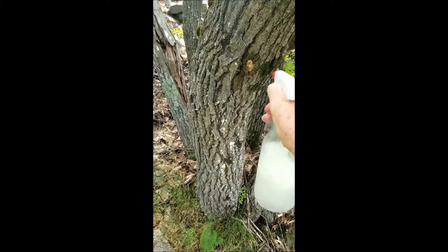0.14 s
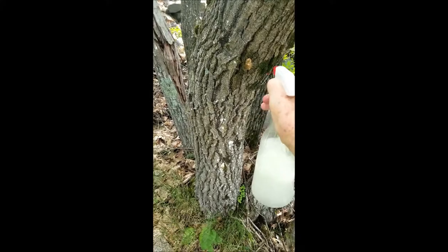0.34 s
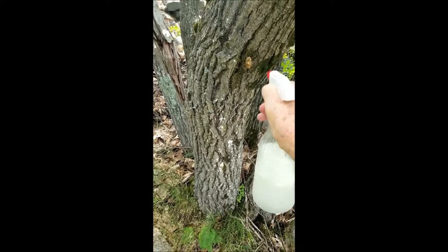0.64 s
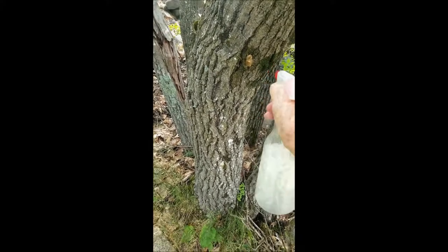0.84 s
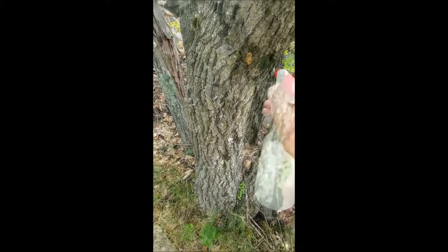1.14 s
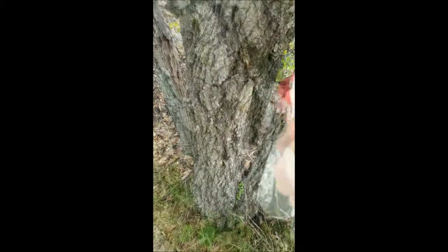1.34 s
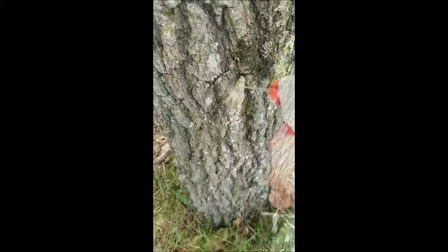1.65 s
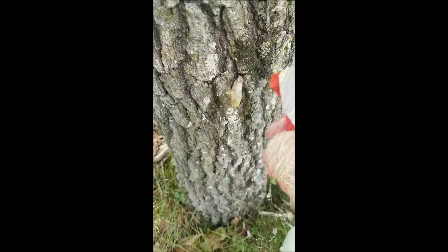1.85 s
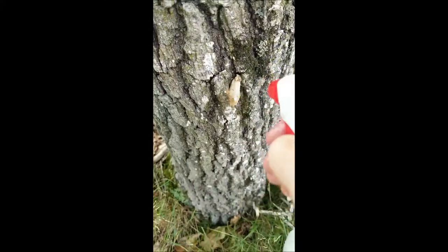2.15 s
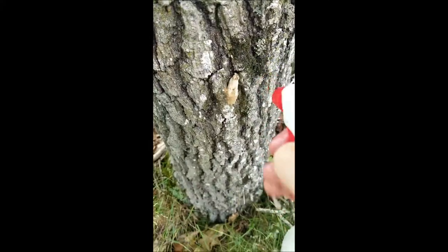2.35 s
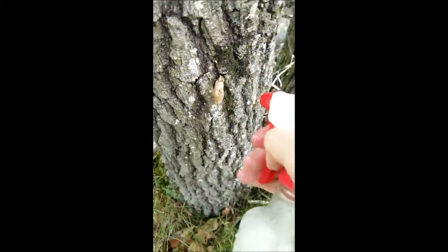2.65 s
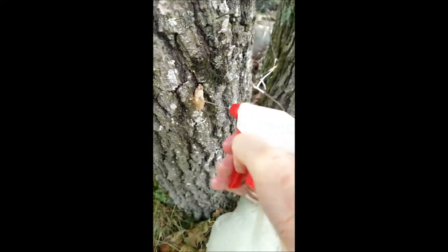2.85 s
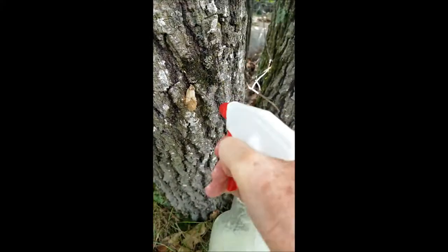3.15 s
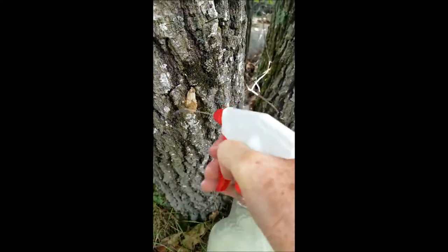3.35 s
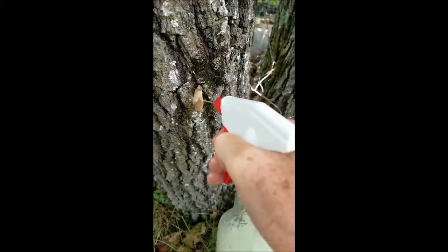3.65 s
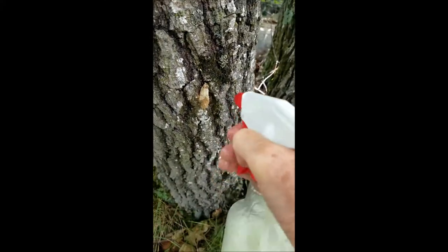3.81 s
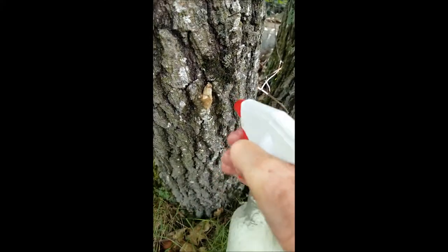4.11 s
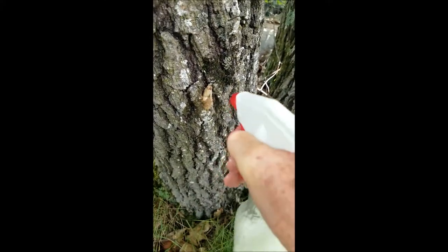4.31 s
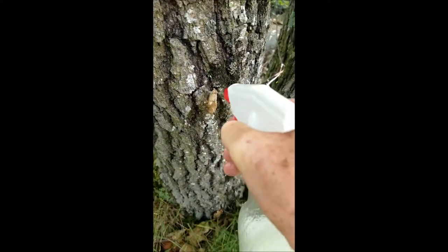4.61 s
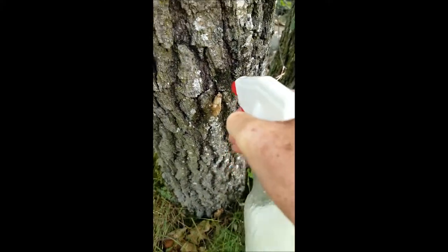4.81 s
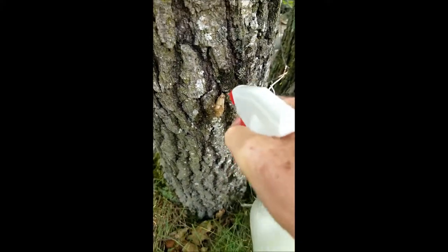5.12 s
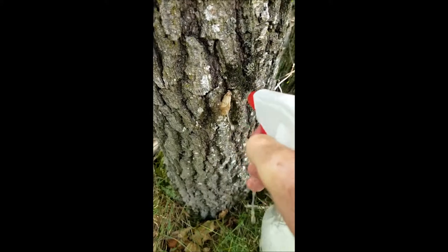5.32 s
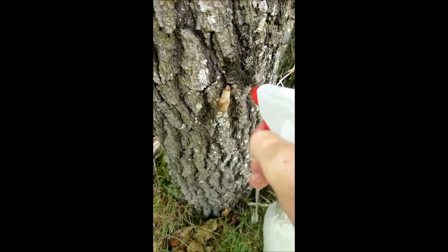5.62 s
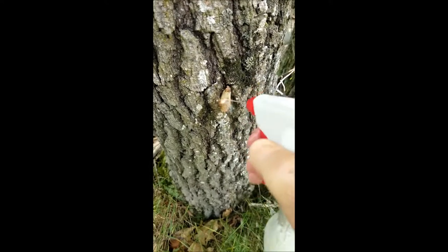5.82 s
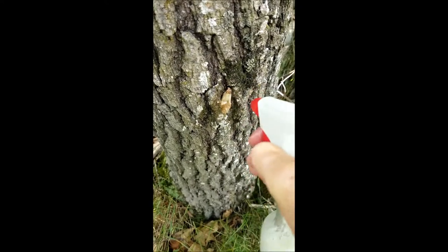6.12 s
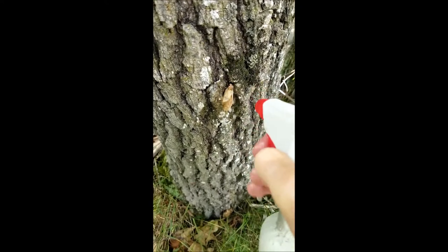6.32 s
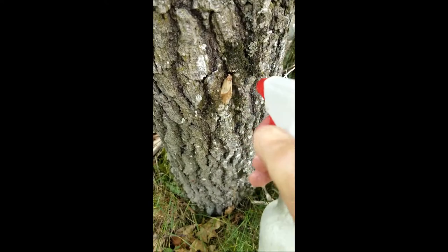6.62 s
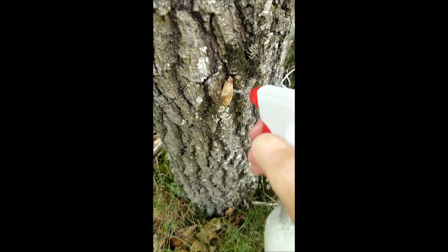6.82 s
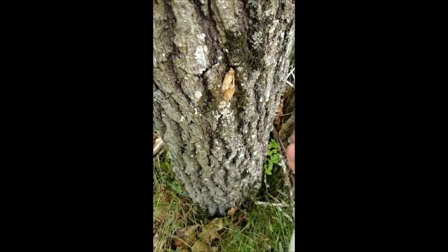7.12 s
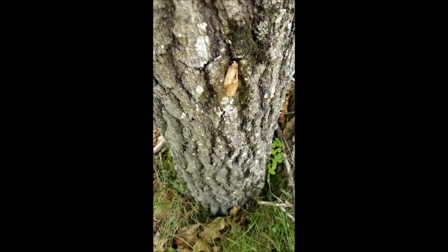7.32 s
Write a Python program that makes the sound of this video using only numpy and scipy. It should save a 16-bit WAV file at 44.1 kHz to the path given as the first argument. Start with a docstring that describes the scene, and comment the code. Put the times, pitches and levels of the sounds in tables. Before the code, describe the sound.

A plastic trigger spray bottle squirts at a tree trunk in a garden, close to the microphone and to the left. Two faint squirts come in the first half second. From about 0.8 seconds they are louder and repeat roughly three times a second, each a brief, bright hiss with drops spattering on bark. Wind and handling thump and rumble on the microphone until about 1.5 seconds, strongest around 1 second. The spraying is fullest from 1.3 to 2.3 seconds, softer near 3.4 and 4.6, and strong again from 5.5 until the last squirt near 6.9. Faint trigger ticks, dull hollow knocks and a few tiny air bubbles fall among the squirts, with a few last clicks after 7 seconds. Leaves hiss softly throughout. A distant engine's low hum comes in around 1.5 seconds, swelling and fading, loudest just after 6 seconds.

```python
"""In a garden, a plastic spray bottle is pumped at a tree trunk about three times a second.
Each squeeze, close to the left microphone, is a nozzle hiss plus drops spattering in the bark's grooves.
The trigger ticks and knocks against its stop, and now and then air bubbles back into the bottle.
Wind and handling bump the microphone at first, and a far engine hums behind the soft hiss of leaves."""
import sys
import numpy as np
from scipy import signal
from scipy.fft import rfft, irfft
from scipy.io import wavfile

SR = 44100
rng = np.random.default_rng(int(sys.argv[2]) if len(sys.argv) > 2 else 0)


def store_pcm(level_fs):
    """Save levels as 16-bit WAV."""
    pcm = np.round(np.clip(level_fs, -1, 1) * 32767).astype(np.int16)
    wavfile.write(sys.argv[1], SR, np.atleast_2d(pcm).T)


N = 328986
TIME = np.arange(N) / SR

# Levels in the tables are relative: the functions turn each layer up or down as a whole.
# Squeezes of the trigger; the jet's times count from the start of each squeeze:
# (start [s], length [s], hiss [dB], spatter [dB], splash [dB], pitch of the bark groove [Hz],
# jet crosses the groove [s], lingers there [s], jet meets wet bark [s], right side against left [dB])
SQUEEZES = [(0.018, 0.064, -51.5, -50, -48.5, 4460, .047, .06, 0.056, 0.5),
            (0.471, 0.059, -49, -49.5, -62, 5540, .004, .06, .05, -0.5),
            (0.759, 0.11, -34.5, -41.5, -49, 6500, 0.039, .052, 0.05, -9.5),
            (0.902, 0.046, -47, -44, -44, 4220, .002, 0.013, 0.033, -1),
            (1.057, 0.1, -35, -43.5, -49.5, 5850, .012, 0.058, .044, -8.5),
            (1.345, 0.11, -31, -28.5, -42.5, 6300, 0.055, 0.041, 0.031, -7.5),
            (1.626, 0.11, -30, -26.5, -36, 5500, 0.048, 0.04, 0.015, -9.5),
            (1.922, .112, -39, -43, -48, 6400, 0.038, 0.062, .051, -9),
            (2.2, 0.11, -29.5, -24.5, -32, 3900, 0.037, 0.054, 0.004, -8.5),
            (2.521, 0.11, -36, -30.5, -35.5, 3920, 0.062, 0.027, 0.07, -7.5),
            (2.822, 0.089, -39, -36.5, -46.5, 3540, 0.041, 0.024, 0.036, -9.5),
            (3.079, 0.081, -40, -34.5, -40.5, 4180, 0.055, .018, 0.061, -7),
            (3.36, 0.11, -47, -48, -42.5, 4100, 0.077, 0.013, 0.097, -6),
            (3.63, 0.12, -33.5, -28, -42.5, 6340, 0.078, 0.016, 0.084, -8),
            (3.956, 0.1, -35, -39.5, -33.5, 5300, .053, 0.048, .076, -7.5),
            (4.251, .1, -31, -30.5, -33.5, 4400, .042, 0.046, .006, -6.5),
            (4.582, .118, -40, -50.5, -55, 6500, .03, 0.074, .041, -8),
            (4.887, .104, -36, -46.5, -51, 6240, 0.075, 0.07, 0.099, -9.5),
            (5.204, .11, -31.5, -35, -49, 5900, 0.09, 0.071, 0.044, -8),
            (5.514, 0.11, -32, -23.5, -36, 5900, 0.023, 0.059, 0.017, -8),
            (5.833, 0.1, -31.5, -24, -33, 5600, .047, 0.024, 0.024, -7),
            (6.176, 0.11, -33, -30, -31.5, 5040, 0.026, 0.091, 0.015, -8),
            (6.505, .096, -28.5, -27.5, -41, 6200, 0.045, 0.027, 0.049, -7),
            (6.839, 0.094, -30.5, -29.5, -38.5, 6200, 0.063, 0.05, 0.036, -7)]
# The jet spits or hits a hollow in the bark: (time [s], level [dB], pitch [Hz], length [s])
SPITS = [(.476, -42, 14000, .007), (1.054, -25, 14500, 0.0057), (1.066, -25, 13600, 0.0087),
         (1.348, -36, 14500, .006), (1.625, -28, 3000, 0.016), (1.675, -16.5, 5800, .012),
         (1.702, -14, 6500, .01), (1.92, -30.5, 14000, 0.0074), (2.518, -36, 15000, .008),
         (3.066, -22.5, 4140, 0.015), (3.067, -31, 13500, .012), (3.359, -31, 15000, 0.01),
         (3.36, -33, 3340, .009), (2.203, -25, 3220, 0.019), (3.695, -22, 5550, 0.022),
         (4.285, -20.5, 4000, 0.016), (5.216, -29, 13500, .01), (5.285, -23.5, 4630, 0.011),
         (5.567, -16.5, 5550, 0.014), (5.867, -24, 5800, .012), (5.908, -32, 6290, .01),
         (6.54, -21, 6190, 0.013)]
# Trigger, spring and fingers click on the plastic: (time [s], level [dB], pitch [Hz])
TICKS = [(.886, -45, 2240), (1.186, -44, 2100), (1.476, -45, 1200), (1.554, -42, 3830), (1.77, -43, 2220),
         (2.056, -44, 5970), (2.1435, -40, 1540), (2.334, -42, 2400), (2.464, -42.5, 1780),
         (2.6345, -40, 2080), (2.658, -39, 2320), (2.742, -44, 6100), (2.9463, -43.5, 4240),
         (3.249, -33, 1840), (3.32, -43.5, 6400), (3.598, -43.5, 3590), (3.803, -44.5, 3600),
         (4.095, -43.5, 3800), (5.0495, -43, 2130), (5.13, -45, 1100), (5.743, -40, 1300),
         (6.054, -39.5, 2130), (6.935, -37.5, 3010), (7.157, -35.5, 1200), (7.162, -37.5, 3400),
         (7.2798, -38, 3250)]
# The trigger hits its stop and the bottle sounds hollow: (time [s], level [dB], pitch [Hz])
KNOCKS = [(.761, -37.5, 298), (1.552, -42.5, 249), (1.706, -44.5, 304), (2.002, -49.5, 300),
          (2.729, -46.5, 265), (3.131, -41.5, 287), (3.251, -43.5, 229), (3.712, -44.5, 287),
          (4.321, -42, 236), (4.838, -49, 263), (4.969, -41, 270), (5.292, -45.5, 280), (6.907, -40.5, 306)]
# Air bubbles back into the bottle: (time [s], level [dB], pitch [Hz])
BUBBLES = [(2.147, -53, 1600), (2.476, -39, 1770), (2.72, -44, 2200), (3.511, -47.5, 2300),
           (4.838, -48, 1670), (5.983, -40.5, 2294)]
# One gust on the microphone that dies away: (time [s], level [dB])
GUST_LEVELS = [(0, -47), (.33, -53), (.72, -49.5), (.83, -32), (.94, -40.5), (1.12, -35.5), (1.19, -44.5),
               (1.46, -46), (1.56, -72)]
# Thumps and scuffs on the microphone, from wind and handling:
# (time [s], level [dB], pitch [Hz], length [cycles])
MIC_BUMPS = [(0.2, -29, 72, 0.94), (0.667, -32.5, 56, 2.2), (0.816, -35.5, 306, 2.6),
             (.818, -21.5, 58.5, 1.2), (.877, -25, 80, 1.35), (0.982, -27, 59.6, 1),
             (1.062, -25.5, 199, 4.2), (1.071, -32.5, 386, 3), (1.105, -24, 86.6, 1.85),
             (1.138, -27, 59.6, 1.2), (1.236, -21, 76.4, 1.75), (1.26, -35, 263, 3.6),
             (1.455, -33, 65, 1.6), (2.125, -42, 60, 1.7)]
# The far engine swells and fades: (time [s], level [dB])
ENGINE_LEVELS = [(.7, -65), (1.45, -49), (2.05, -48.5), (2.34, -43), (3.3, -45.5), (4.25, -52), (4.68, -45),
                 (5.1, -43), (5.35, -46.5), (6.07, -37.5), (6.32, -37), (6.72, -45.5), (7.06, -39),
                 (7.46, -42.5)]
# The tones in the engine's hum: (pitch [multiples of the firing rate], level [dB])
ENGINE_TONES = [(.5, -27), (1, 3.5), (1.5, -20.5), (2, -25), (2.5, -24), (3, -43), (3.5, -29.5)]
# The garden's background: (time [s], leaf hiss [dB], far rumble [dB])
GARDEN_LEVELS = [(0, -60, -58), (.48, -62.5, -69), (.95, -60, -55.5), (1.7, -61, -60), (2.9, -64, -66.5),
                 (3.9, -64, -63.5), (6.2, -57.5, -56), (6.7, -60, -57.5), (7.46, -59.5, -61)]
# The highest part of the leaf hiss: (time [s], level [dB])
FINE_HISS_LEVELS = [(0, -63), (1.7, -64), (2.8, -70.5), (4.7, -64), (6.0, -61.5), (7.46, -63.5)]

# A spectrum says how strong a noise is from low to high.
# Mist leaving the nozzle: (frequency [Hz], level [dB])
NOZZLE_SPECTRUM = [(1500, -10), (3000, -22), (4000, -11), (6200, -1), (7400, -2.5), (8600, -8),
                   (10000, -5.5), (12000, 1), (13700, 4), (15600, 2), (17000, -4.5)]
# Drops hitting bark: (frequency [Hz], level [dB])
SPATTER_SPECTRUM = [(1500, -43), (2400, -2.5), (3100, -0.5), (4000, 0), (6800, 1), (8400, -9),
                    (11000, -3.5), (16000, -15)]
# Drops landing where the bark is already wet: (frequency [Hz], level [dB])
SPLASH_SPECTRUM = [(600, -12.5), (950, -17.5), (1400, -5.5), (2200, -0.5), (2900, 1), (4000, 4),
                   (6000, -35)]
# Wind on the microphone: (frequency [Hz], level [dB])
WIND_SPECTRUM = [(22, -6), (50, 0), (75, 3.5), (110, 0), (150, -6), (200, -11), (280, -19), (700, -34)]
# Hissing leaves: (frequency [Hz], level [dB])
LEAF_SPECTRUM = [(410, -2.5), (700, -2.5), (934, -5), (1080, -2.5), (1380, -3.5), (2160, -3), (2560, -4.5),
                 (3280, -3), (4430, -4), (5610, -4), (8650, -13.5), (12800, -5.5), (16000, -8.5)]
# Far rumble: (frequency [Hz], level [dB])
RUMBLE_SPECTRUM = [(30, -16), (60, -1), (150, -0.5), (200, -5), (300, -7), (440, -8.5), (700, -18.5),
                   (1200, -38.5)]


def squirts(open_s, close_s, sag_db, flutter_db):
    """The nozzle turns liquid into mist; drops make a groove in the bark ring and splash on wet spots."""
    mist = shape_noise(droplets(per_s=17000, spread_db=3.5), NOZZLE_SPECTRUM)
    impacts = shape_noise(droplets(per_s=26000, spread_db=1), SPATTER_SPECTRUM)
    splashes = shape_noise(droplets(per_s=4000, spread_db=0), SPLASH_SPECTRUM)
    hiss, bark = np.zeros((2, 2, N))
    sides_db = np.zeros((2, N))
    for start, length, hiss_db, spatter_db, splash_db, hz, groove_s, linger_s, wet_s, right_db in SQUEEZES:
        span = slice(int(start * SR), int((start + length) * SR))
        t = TIME[span] - start
        # The valve snaps open, then closes as the pressure runs out.
        valve = np.clip(np.minimum(t / open_s, (length - t) / close_s), 0, 1)
        flow = valve * from_db(-sag_db * (2 * t / length - 1) ** 2)  # strongest in the middle
        off_groove = off_target(t, groove_s, linger_s)
        off_wet = off_target(t, wet_s, linger_s=0.033)
        ringing = rms_one(resonate(impacts[:, span], hz, q=1.38))
        # Each part is quieter while the jet is beside its spot.
        hiss[:, span] += flow * from_db(hiss_db - 0.5 - 9 * off_groove) * mist[:, span]
        bark[:, span] += flow * from_db(spatter_db - 18.5 * off_groove) * ringing
        bark[:, span] += flow * from_db(splash_db - 14.5 * off_wet) * splashes[:, span]
        sides_db[1, span.start:] = right_db
    spray = from_the_left(hiss, right_db=-0.5, direct=0.13) + from_the_left(bark, right_db=-3, direct=0.13)
    flutter = flutter_db * drift(per_s=220)  # the jet breaks up unevenly
    return from_db(sides_db + flutter) * trunk_echo(spray, delay_s=0.000895, strength=0.43)


def off_target(t, crossing_s, linger_s):
    """How far the sweeping jet is from a spot: 0 right on it, 1 well beside it."""
    return 1 - np.exp(-((t - crossing_s) / linger_s) ** 2)


def trunk_echo(spray, delay_s, strength):
    """Sound bounces off the trunk; the path changes as the hand moves, so each squirt has its own tone."""
    moving_delay = delay_s * from_db(2.21 * drift(per_s=5))
    echo = np.array([np.interp(TIME - moving_delay, TIME, side) for side in spray])
    return (spray + strength * echo) / np.sqrt(1 + strength ** 2)


def spits(gain_db, q):
    """The jet spits or hits a hollow: a brief swell of spray around one bright pitch."""
    out, noise = np.zeros((2, N)), rng.standard_normal((2, N))
    for start, db, hz, length in SPITS:
        span = slice(int(start * SR), int((start + length) * SR))
        ringing = resonate(noise[:, span], hz, q)
        burst = rms_one(resonate(ringing, hz, q / 4))
        swell = signal.windows.tukey(burst.shape[1], 0.6)
        out[:, span] += from_db(db + gain_db) * burst * swell
    return from_the_left(out, right_db=-12, direct=0.34)


def trigger_ticks(gain_db, rise_s, ring_s, extra_per_s):
    """The trigger sticks and slips, making tiny rattles that die quickly in the plastic."""
    out, t = np.zeros((2, N)), TIME[:SR // 10]
    envelope = (1 - np.exp(-t / rise_s)) * fade(t, ring_s)
    # Extra faint ticks come at random times and pitches.
    chance = rng.random((int(extra_per_s * N / SR), 2))
    faint_ticks = [(when * TIME[-1], -44.5, 2600 * 2 ** (2 * pitch - 1)) for when, pitch in chance]
    for start, db, hz in TICKS + faint_ticks:
        rattle = resonate(rng.standard_normal((2, len(t))) * envelope, hz, q=1.23)
        at = int(start * SR)
        out[:, at:at + len(t)] += from_db(db + gain_db) * rms_one(rattle)[:, :N - at]
    dulled = signal.sosfilt(signal.butter(1, 8750, fs=SR, output="sos"), out)
    return from_the_left(dulled, right_db=-3, direct=0.18)


def trigger_knocks(gain_db, ring_s, clack_db, clack_s):
    """The trigger hits its stop with a dull clack, and the bottle rings with a short, low note."""
    out, t = np.zeros(N), TIME[:SR // 8]
    for start, db, hz in KNOCKS:
        note = np.sin(2 * np.pi * hz * t) * fade(t, ring_s)
        clack = rms_one(resonate(rng.standard_normal(len(t)), hz=547, q=2.1)) * fade(t, clack_s)
        at = int(start * SR)
        out[at:at + len(t)] += from_db(db + gain_db) * (note + from_db(clack_db) * clack)
    return out * balance(1.5, -1.5)


def bubbles(gain_db, ring_s, pitch_rise):
    """Each air bubble entering the bottle rings briefly, rising a little in pitch."""
    out, t = np.zeros(N), TIME[:SR // 8]
    for start, db, hz in BUBBLES:
        ring = np.sin(2 * np.pi * hz * t * (1 + pitch_rise * t)) * fade(t, ring_s)
        at = int(start * SR)
        out[at:at + len(t)] += from_db(db + gain_db) * ring
    return out * balance(2.5, -3)


def wind(gain_db, lumpy_db):
    """Swirling air makes a lumpy rumble on the microphone."""
    gust_db, = curves(GUST_LEVELS)
    gust = from_db(gust_db + gain_db + lumpy_db * drift(per_s=49))
    return gust * stereo_noise(WIND_SPECTRUM, shared=0.14)


def mic_bumps(gain_db, uneven_db):
    """Wind and handling thump and scuff the microphone, each time with a few quick, low swings."""
    out = np.zeros((2, N))
    lag_cycles = np.array([[0], [0.2]])  # a bump reaches the right side later
    for start, db, hz, cycles in MIC_BUMPS:
        span = slice(int(start * SR), int(start * SR) + SR // 10)
        cycles_done = np.clip((TIME[span] - start) * hz - lag_cycles, 0, cycles)
        strength = from_db(db + gain_db + uneven_db * rng.standard_normal((2, 1)))
        swell = np.sin(np.pi * cycles_done / cycles)
        out[:, span] += strength * swell * np.sin(2 * np.pi * cycles_done)
    return out


def far_engine(firing_hz, gain_db, waver_db, throb_db):
    """An engine's firing makes one strong tone and weaker, wavering ones; its crank adds a rough throb."""
    hum_db, = curves(ENGINE_LEVELS)
    phase = 2 * np.pi * np.cumsum(firing_hz + 0.2 * drift(per_s=1.99)) / SR
    hum = 0
    for multiple, db in ENGINE_TONES:
        waver = from_db(waver_db * (multiple != 1) * drift(per_s=7))
        hum += from_db(db) * waver * np.sin(multiple * phase + 2 * np.pi * rng.random())
    throb = rms_one(resonate(stereo_noise(RUMBLE_SPECTRUM, shared=0.96), hz=58.5, q=3.8))
    return (np.sqrt(2) * from_db(hum_db + gain_db) * hum + from_db(throb_db) * throb) * balance(1.3, -1.5)


def garden_air(leaf_gain_db, fine_gain_db, rumble_gain_db):
    """Leaves hiss softly over a far rumble; the highest part of the hiss comes and goes."""
    leaf_db, rumble_db = curves(GARDEN_LEVELS)
    fine_db, = curves(FINE_HISS_LEVELS)
    hiss = stereo_noise(LEAF_SPECTRUM, shared=0.018)
    leaves = rms_one(signal.sosfilt(signal.butter(4, 7200, "low", fs=SR, output="sos"), hiss))
    fine_hiss = rms_one(signal.sosfilt(signal.butter(4, 7200, "high", fs=SR, output="sos"), hiss))
    rumble = stereo_noise(RUMBLE_SPECTRUM, shared=0.61)
    return (from_db(leaf_db + leaf_gain_db) * leaves * balance(1.6, -1.6)
            + from_db(fine_db + fine_gain_db) * fine_hiss * balance(0.7, -0.7)
            + from_db(rumble_db + rumble_gain_db) * rumble * balance(1.5, -1.5))


def droplets(per_s, spread_db):
    """Two rows of tiny random hits of uneven size."""
    sizes = from_db(spread_db * np.minimum(rng.exponential(1, (2, N)), 4)) * rng.standard_normal((2, N))
    hits = rng.random((2, N)) < per_s / SR
    return rms_one(sizes * hits)


def from_the_left(pair, right_db, direct):
    """Row 0 goes left; the right side hears it later and weaker, mixed with scattered sound (row 1)."""
    late = np.interp(TIME - 0.00019, TIME, pair[0])
    right = from_db(right_db) * (np.sqrt(direct) * late + np.sqrt(1 - direct) * pair[1])
    ring = from_db(-2.5) * resonate(right, hz=8600, q=7.5)  # the right microphone's opening rings
    return np.array([pair[0], right + ring])


def stereo_noise(spectrum, shared):
    """Noise whose left and right sides are partly the same (shared runs from 0 to 1)."""
    common, separate = rng.standard_normal(N), rng.standard_normal((2, N))
    return shape_noise(np.sqrt(shared) * common + np.sqrt(1 - shared) * separate, spectrum)


def shape_noise(noise, spectrum):
    """Give noise a spectrum that falls away past its ends, at an average strength of 1."""
    hz, db = np.transpose(spectrum)
    freqs = np.maximum(np.fft.rfftfreq(N, 1 / SR), 1)
    gain = from_db(np.interp(np.log(freqs), np.log(hz), db))
    edges = np.minimum(freqs / hz[0], 1) ** 2 * np.minimum(hz[-1] / freqs, 1) ** 2
    return rms_one(irfft(rfft(noise) * edges * gain, N))


def resonate(x, hz, q):
    """Keep the sound near one pitch; a higher q makes it narrower and ring longer."""
    return signal.lfilter(*signal.iirpeak(hz, max(q, hz / (0.4 * SR)), fs=SR), x)


def drift(per_s):
    """A wandering value that glides to a new random point per_s times a second."""
    points = rng.standard_normal(N)
    return np.interp(TIME * per_s, np.arange(N), points)


def curves(table):
    """Join a table's points with straight lines: one curve for each column after the time."""
    times, *columns = np.transpose(table)
    return [np.interp(TIME, times, column) for column in columns]


def fade(t, ring_s):
    """Die away by 60 dB in ring_s seconds."""
    return from_db(-60 * t / ring_s)


def balance(left_db, right_db):
    """Volume factors for the two sides."""
    return from_db([[left_db], [right_db]])


def rms_one(x):
    """Scale a sound to an average strength (root mean square) of 1."""
    return x / np.sqrt(np.mean(x ** 2) + 1e-20)


def from_db(db):
    """Turn decibels into a volume factor."""
    return 10 ** (np.asarray(db) / 20)


def scene():
    """The spray bottle in front of the garden's background."""
    bottle = squirts(open_s=0.0063, close_s=0.022, sag_db=2.5, flutter_db=1.28)
    bottle += spits(gain_db=-6.5, q=2.9)
    bottle += trigger_ticks(gain_db=-18, rise_s=0.00047, ring_s=0.046, extra_per_s=1.4)
    bottle += trigger_knocks(gain_db=1.5, ring_s=0.05, clack_db=-10, clack_s=0.066)
    bottle += bubbles(gain_db=-5.5, ring_s=0.042, pitch_rise=1.2)
    background = far_engine(firing_hz=118, gain_db=-3, waver_db=5.5, throb_db=-56.5)
    background += garden_air(leaf_gain_db=3, fine_gain_db=2.5, rumble_gain_db=3.5)
    background += wind(gain_db=3.5, lumpy_db=2.5) + mic_bumps(gain_db=1.5, uneven_db=0.8)
    return bottle + background


def record(dry):
    """Cut away the very highest treble, above 15900 Hz."""
    return signal.sosfilt(signal.ellip(12, 0.1, 80, 15900, fs=SR, output="sos"), dry)


dry = scene()
out = record(dry)
store_pcm(out)
```